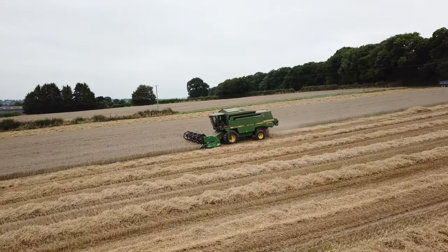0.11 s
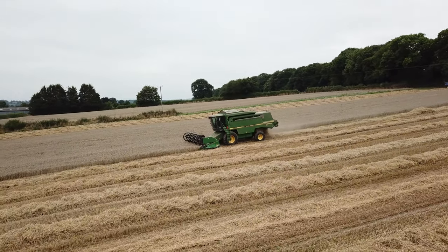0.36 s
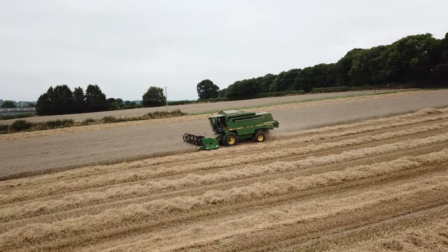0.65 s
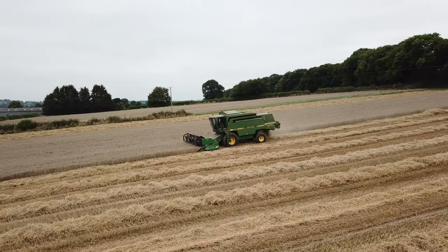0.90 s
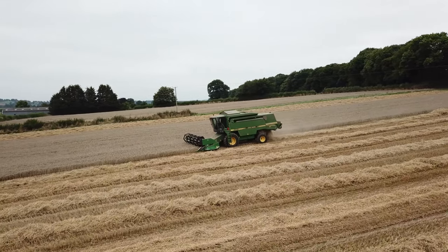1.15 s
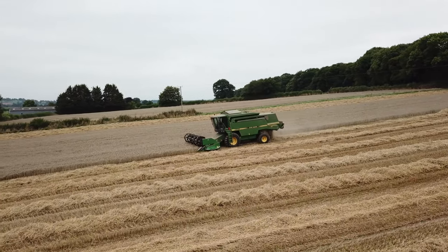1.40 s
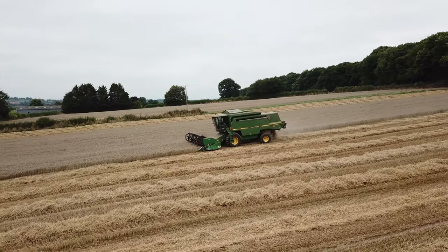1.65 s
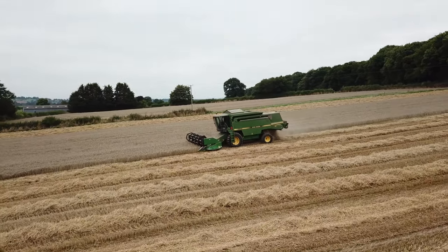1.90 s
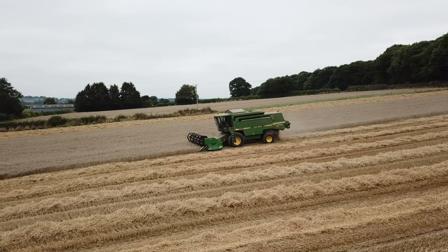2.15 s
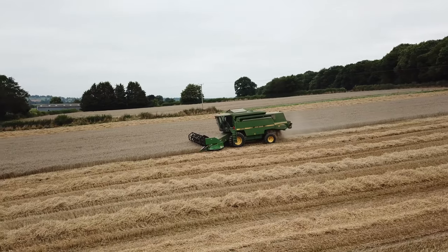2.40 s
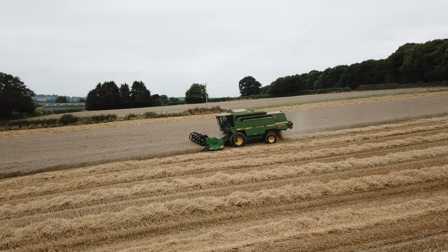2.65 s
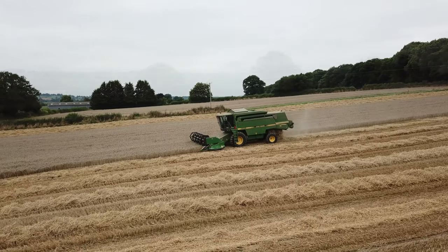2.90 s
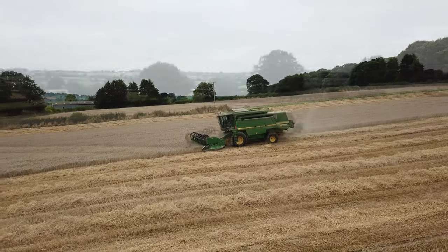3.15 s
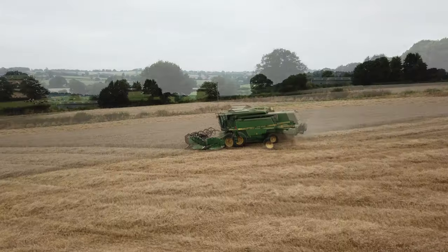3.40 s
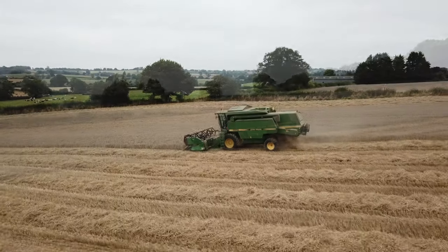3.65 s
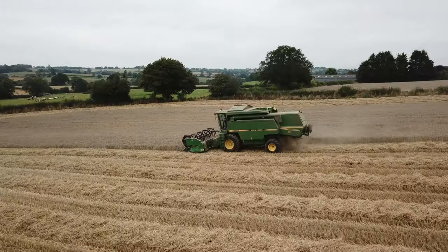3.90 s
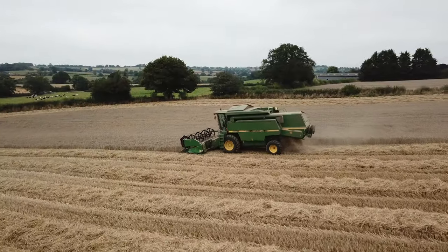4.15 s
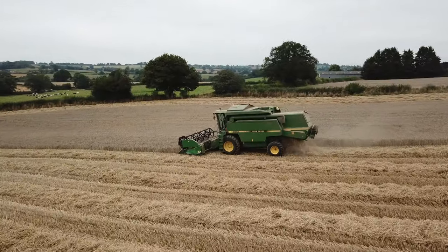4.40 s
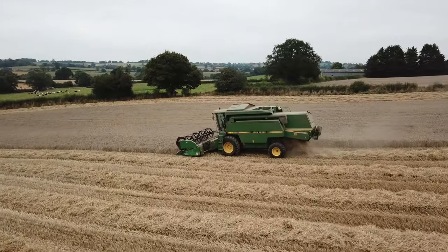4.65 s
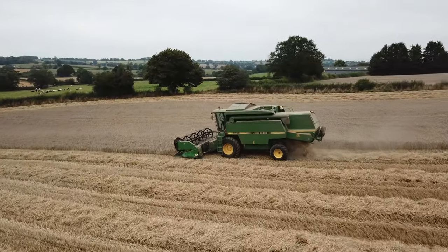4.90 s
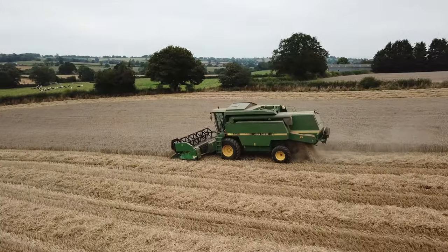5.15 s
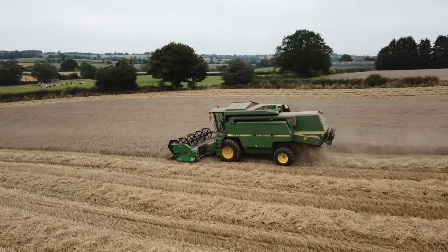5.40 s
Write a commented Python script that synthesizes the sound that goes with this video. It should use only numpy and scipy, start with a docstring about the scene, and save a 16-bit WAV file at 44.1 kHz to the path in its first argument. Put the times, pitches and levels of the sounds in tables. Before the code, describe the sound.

Outdoors in an open field, a combine harvester works some way off with a low throbbing engine, drum hum and muffled threshing roar. Close to the microphone a small motor whines steadily and hisses, and wind thumps. A grainy rattle swells, a belt squeals, then after a momentary dip the engine returns stronger, with small metal clinks.

```python
"""A combine harvester works a field some way off, heard from two spots. Throughout, shaft orders and
a drum hum (sines) lie under threshing roar (shaped noise); a small motor by the microphone whines
(multiples of its speed) and rasps (pulsed hiss), and wind rumbles on the microphone. At the first
spot faint tones come from 1.8 s, a header rattle swells from about 2 s and a belt squeals at 2.9 s.
A quick fade at 3.4 s joins the second spot, where small metal parts clink (decaying sines)."""
import sys
import numpy as np
from scipy import signal
from scipy.fft import rfft, irfft
from scipy.io import wavfile
from scipy.ndimage import uniform_filter1d

SR = 44100
rng = np.random.default_rng(int(sys.argv[2]) if len(sys.argv) > 2 else 0)


def generate_wav(signal):
    """Clip the signal to [-1, 1] and save it as 16-bit WAV at the path in sys.argv[1]."""
    frames = np.transpose(np.atleast_2d(signal))
    scaled = np.clip(frames, -1, 1) * 32767
    pcm = np.round(scaled).astype(np.int16)
    wavfile.write(sys.argv[1], SR, pcm)


def elevation(decibels):
    """Turn decibel levels (scalar or array-like) into linear amplitude ratios."""
    levels = np.asarray(decibels, float)
    return 10 ** (levels / 20)


N = 243873
T = np.arange(N) / SR
JOIN_S = 3.3965


def level(x, rms_db):
    """Scale to an rms level."""
    return x * elevation(rms_db) / np.sqrt(np.mean(x ** 2))


def columns(tables):
    """Curve tables laid end to end, one value per sample for each column."""
    t_s, *curves = np.transpose(sum(tables, []))
    return [np.interp(T, t_s, curve) for curve in curves]


def by_spot(first, second):
    """One value before the join, another after it."""
    return np.where(T < JOIN_S, first, second)


def walk(rate_hz):
    """Random levels held 1 / rate and slewed twice; standard deviation 1."""
    hold = int(SR / rate_hz)
    steps = np.repeat(rng.standard_normal(N // hold + 1), hold)
    slewed = uniform_filter1d(uniform_filter1d(steps, hold), hold)[:N]
    return slewed / slewed.std()


def noise(colour):
    """Noise shaped by (f/Hz, relative level/dB) points, rms 1."""
    hz, db = np.transpose(colour)
    bin_hz = np.arange(1, N // 2 + 2) * SR / N
    gain = elevation(np.interp(np.log(bin_hz), np.log(hz), db))
    return level(irfft(rfft(rng.standard_normal(N)) * gain, N), 0)


def tone(hz, waver_db, waver_turns, rate_hz):
    """A sine of rms about 1 whose level and phase waver at random."""
    turns = np.cumsum(hz + 0 * T) / SR + rng.random() + waver_turns * walk(rate_hz)
    return np.sqrt(2) * elevation(waver_db * walk(rate_hz)) * np.sin(2 * np.pi * turns)


# Wind rumble strength, one curve per spot: t/s, level/dB
WIND = [
    [(0.0, -30), (0.4, -36.5), (0.75, -29), (1.0, -32), (1.35, -35), (2.0, -33), (2.5, -27.5), (2.9, -35.5),
     (3.1, -29.5), (3.38, -33)],
    [(3.41, -37), (3.9, -32.5), (4.05, -38.5), (4.35, -33.5), (4.5, -39), (4.7, -33), (5.53, -35.5)],
]
# Rumble spectrum per spot: f/Hz, relative level/dB
WIND_COLOUR = [
    [(8, -25), (16, -9), (28, -1), (45, 1.5), (70, 5), (120, 0), (220, -25.5), (400, -30), (1600, -90),
     (8000, -160)],
    [(8, -32.5), (20, -18), (38, 0.5), (55, -2), (80, 1.5), (120, -4), (220, -14), (400, -35),
     (1600, -85.5), (8000, -160)],
]
# Buffets on the microphone: t/s, pulse scale/dB, half width/s
BUFFETS = [(0.672, -13, 0.0023), (0.799, -17, 0.0023), (0.883, -17, 0.0023), (0.923, -17, .004),
           (0.972, -18, 0.0045), (1.2, -14, 0.0032), (2.091, -29, 0.0036), (2.387, -20, 0.0028),
           (2.487, -19, .003), (2.672, -16, .0035), (3.107, -21, 0.0036), (3.374, -9.5, 0.0037)]
GUST_DB, GUST_RATE_HZ = 1., 18.


def wind():
    """Gusty low-frequency noise plus single deep pressure pulses."""
    db, = columns(WIND)
    out = elevation(db + GUST_DB * walk(GUST_RATE_HZ)) * by_spot(*map(noise, WIND_COLOUR))
    for t_s, scale_db, half_s in BUFFETS:
        u = (T - t_s) / half_s
        dip = (u ** 2 / 4 - 1) * np.exp(-u ** 2 / 2)
        broad = 0.39 * np.exp(-u ** 2 / 16)
        out = out + elevation(scale_db) * (dip + broad)
    return out


# Faint rough tones: start t/s, length/s, first f/Hz, last f/Hz, level/dB
STREAKS = [(1.78, .27, 860, 870, -58), (2.09, .27, 1003, 1003, -55.5), (2.45, .4, 755, 720, -57),
           (3.358, .022, 1085, 1085, -50), (3.399, .037, 1170, 1185, -44), (3.45, 2.1, 1034, 1034, -62)]
STREAK_EDGE_S = .005


def streaks():
    """Unsteady tones come and go in the middle range; those under 0.2 s waver less."""
    out = 0
    for t_s, length_s, first_hz, last_hz, db in STREAKS:
        on = np.clip(np.minimum(T - t_s, t_s + length_s - T) / STREAK_EDGE_S, 0, 1)
        hz = np.interp(T, [t_s, t_s + length_s], [first_hz, last_hz])
        rough = min(length_s / .2, 1)
        out = out + on * elevation(db) * tone(hz, 2.5 * rough, .1 * rough, 35.)
    return out


MOTOR_HZ = 77.515  # turns per second
# Motor hiss spectrum per spot: f/Hz, relative level/dB
RASP = [
    [(2400, -31), (3000, -3), (3500, -6.5), (4400, -5.5), (4950, 1), (5350, -4.5), (6100, -7), (6600, -6),
     (7100, -9.5), (8100, -10), (8950, -22.5), (9400, -24.5), (10600, -23.5), (11100, -27.5), (12400, -30),
     (13100, -40), (13600, -64)],
    [(2400, -22), (3000, 1), (3750, 0), (4400, -3.5), (5000, -2), (6100, -3.5), (6500, 1), (6850, 1),
     (7200, -4.5), (8000, -15.5), (8400, -11.5), (9100, -18.5), (9600, -15.5), (10800, -24), (11700, -25),
     (13200, -41), (13700, -53.5)],
]
# Hiss rms before pulsing at each spot: level/dB
RASP_DB = [-52, -52.5]


def rasp():
    """Brush and bearing hiss of the motor, pulsing once, twice and four times a turn."""
    hiss = by_spot(*(elevation(db) * noise(colour) for colour, db in zip(RASP, RASP_DB)))
    turn_rad = 2 * np.pi * MOTOR_HZ * T
    pulse = 1 + 0.024 * np.sin(turn_rad) + 0.037 * np.sin(2 * turn_rad) + 0.08 * np.sin(4 * turn_rad)
    return hiss * pulse


# Motor partials: multiple of the motor turn, first-spot level/dB, second-spot level/dB
WHINE = [(12, -63, -63), (13, -64, -84), (22, -47.5, -46), (24, -48.5, -56), (26, -58, -57), (30, -63, -59),
         (31, -69, -63), (33, -71, -66), (34, -59, -59), (36, -58, -54), (38, -71, -72), (42, -85, -78),
         (44, -84, -70), (45, -79, -74), (46, -66, -63), (47, -76, -73), (48, -66, -56), (50, -68, -78),
         (51, -78, -83), (52, -71, -82), (54, -67, -68), (55, -71, -71), (56, -65, -69), (57, -78, -91),
         (58, -64, -68), (59, -74, -81), (60, -64, -72), (61, -68, -74), (62, -62, -64), (63, -84, -76),
         (64, -76, -78), (65, -72, -87), (66, -72, -74), (67, -75, -87), (71, -82, -78), (72, -73, -74),
         (78, -79, -82), (80, -78, -79), (84, -71, -67), (86, -76, -71), (88, -76, -71), (96, -85, -83),
         (100, -93, -87), (106, -83, -90), (108, -81, -86), (109, -84, -88), (112, -79, -80),
         (114, -88, -91), (120, -93, -87), (122, -95, -87), (144, -98, -96), (146, -97, -95)]
MOTOR_WANDER = .00015  # fraction of speed


def whine():
    """Clean multiples of one motor speed that wanders very slightly; even ones lead."""
    hz = MOTOR_HZ * (1 + MOTOR_WANDER * walk(2.))
    out = 0
    for multiple, first_db, second_db in WHINE:
        out = out + elevation(by_spot(first_db, second_db)) * tone(multiple * hz, .8, 0.025, 9.)
    return out


# Header rattle strength: t/s, level/dB
HEADER = [(0, -53.5), (1.5, -54.5), (2.0, -49.5), (2.8, -48), (3.38, -52.5)]
# Rattle spectrum: f/Hz, relative level/dB
HEADER_COLOUR = [(250, -89), (480, -10.5), (700, -0.5), (850, 2), (1150, -8), (1500, -11), (4000, -120)]


def header():
    """A mid-band noise rattle, made grainy by fast level steps; first spot only."""
    db, = columns([HEADER])
    return (T < JOIN_S) * elevation(db + 1.4 * walk(30.47)) * noise(HEADER_COLOUR)


# Metal strikes: t/s, level/dB, f/Hz, decay time constant/s
CLINKS = [(3.951, -32, 1400, .002), (4.5443, -22.5, 1450, .002), (4.5475, -27, 1950, .0012),
          (4.5505, -28, 1600, .0012), (5.118, -33, 2550, .0012), (5.1347, -36.5, 3780, .0025),
          (5.444, -33, 1803, .003)]
CLINK_ATTACK_S = .0005


def clinks():
    """Small metal parts knock or tick for an instant: sines that decay exponentially."""
    out = 0
    for t_s, db, hz, decay_s in CLINKS:
        age_s = np.maximum(T - t_s, 0)
        envelope = (1 - np.exp(-age_s / CLINK_ATTACK_S)) * np.exp(-age_s / decay_s)
        out = out + elevation(db) * envelope * np.sin(2 * np.pi * hz * age_s)
    return out


SQUEAL_S, SQUEAL_HZ, SQUEAL_SCOOP_HZ = 2.932, 864, 45  # start, pitch, depth of the rise in pitch
SQUEAL_BITE_DB, SQUEAL_HOLD_DB = -40.5, -51
SQUEAL_RISE_S, SQUEAL_GRIP_S, SQUEAL_SETTLE_S = .045, .03, .06
SLIP_HZ, SLIP_DEPTH, SLIP_FIRST_S = 25., .55, 3.048


def squeal():
    """A belt bites, then slips in quick pulses and sings roughly."""
    age_s = np.maximum(T - SQUEAL_S, 0)
    rise = np.minimum(age_s / SQUEAL_RISE_S, 1)
    bite = np.exp(-np.maximum(age_s - SQUEAL_RISE_S - SQUEAL_GRIP_S, 0) / SQUEAL_SETTLE_S)
    loose = 1 - bite
    db = SQUEAL_HOLD_DB + (SQUEAL_BITE_DB - SQUEAL_HOLD_DB) * bite
    on = rise * (T < JOIN_S)
    slip_turns = SLIP_HZ * (T - SLIP_FIRST_S) + .1 * walk(10.)
    slip = 1 + SLIP_DEPTH * loose * np.cos(2 * np.pi * slip_turns)
    hz = SQUEAL_HZ - SQUEAL_SCOOP_HZ * (1 - rise ** 2) + (2 + 4 * loose) * walk(15.)
    return on * slip * elevation(db) * tone(hz, .6 + .8 * loose, .03 + .07 * loose, 60.)


# Drum hum, one curve per spot: t/s, level/dB
DRUM = [
    [(0.0, -41), (0.3, -41), (0.85, -34), (1.1, -37.5), (2.0, -40.5), (2.47, -30), (2.8, -32), (3.38, -40)],
    [(3.41, -49), (3.9, -34), (5.2, -43.5), (5.53, -35)],
]
# Upper hum: f/Hz, first-spot level/dB, second-spot level/dB
DRUM_OCTAVE = (187.6, -45, -46.5)
DRUM_HZ, DRUM_WANDER_HZ, DRUM_WAVER_DB = 93.4, .7, 1.3


def drum():
    """The threshing drum hums low, its speed wandering with the crop, with an octave of steadier pitch."""
    db, = columns(DRUM)
    hum = tone(DRUM_HZ + DRUM_WANDER_HZ * walk(3.), DRUM_WAVER_DB, 0.06, 12.)
    octave_hz, first_db, second_db = DRUM_OCTAVE
    octave = tone(octave_hz, 2.8, 0.044, 6.5)
    return elevation(db) * hum + elevation(by_spot(first_db, second_db)) * octave


# Threshing spectrum per spot: f/Hz, relative level/dB
ROAR = [
    [(71, -24.5), (120, -4), (168, -5), (414, -24), (710, -24), (1170, -21.5), (1590, -16.5), (1680, -19),
     (1900, -22.5), (2140, -23), (2730, -23.5), (3000, -40), (3900, -61), (6600, -120)],
    [(71, -26), (120, -8.5), (161, -7.5), (200, -11.5), (304, -17.5), (431, -29), (1120, -30), (1590, -22),
     (1730, -27.5), (1820, -27.5), (2730, -29.5), (3000, -54.5), (3900, -68), (6600, -120)],
]
# Roar rms before swell at each spot: level/dB
ROAR_DB = [-38, -35.5]


def roar():
    """Broad threshing noise in five overlapping octave bands that swell together and flutter alone."""
    steady = by_spot(*(elevation(db) * noise(colour) for colour, db in zip(ROAR, ROAR_DB)))
    spectrum = rfft(steady)
    octave = np.log2(np.arange(1, len(spectrum) + 1) * SR / N / 250)  # above 250 Hz
    swell_db = 0.31 * walk(7.)
    out = 0
    for centre in range(5):
        share = np.clip(1 - np.abs(np.clip(octave, 0, 4) - centre), 0, 1)
        flutter_db = 0.7 * walk(24.) + 0.4 * walk(4.)
        out = out + irfft(spectrum * share, N) * elevation(swell_db + flutter_db)
    return out


# Engine shaft, one curve per spot: t/s, shaft f/Hz, base level/dB
ENGINE = [
    [(0.0, 38.57, -33), (0.25, 38.58, -30.5), (0.55, 38.4, -34), (0.8, 38.56, -35), (1.2, 38.64, -35),
     (1.55, 38.31, -34), (2.0, 38.69, -35.5), (2.5, 38.33, -34.5), (2.8, 38.77, -34.5), (3.38, 38.52, -34)],
    [(3.41, 37.93, -24), (3.5, 38.1, -27), (3.55, 37.85, -26.5), (3.63, 37.87, -32), (3.79, 38.0, -28),
     (3.87, 38.2, -32), (3.93, 38.32, -25), (4.05, 38.12, -25), (4.11, 37.5, -25.5), (4.18, 37.54, -30),
     (4.25, 37.5, -24.5), (4.32, 37.55, -31.5), (4.41, 37.43, -26.5), (4.5, 37.5, -29.5), (4.9, 38.03, -30),
     (4.97, 37.86, -26.5), (5.09, 37.84, -32), (5.19, 37.75, -26.5), (5.34, 37.86, -31), (5.48, 38.1, -23),
     (5.53, 37.85, -24.5)],
]
# Orders: multiple of shaft f, first-spot level/dB, second-spot level/dB, added to the base level
ENGINE_ORDERS = [(1, -15.5, -24.5), (3, -1.5, -11), (4, 0, 0.5), (4.5, -23, -20), (5, -22.5, -19),
                 (5.5, -18, -21.5), (6, -14.5, -19.5), (7, -23, -20), (8, -21.5, -17), (9, -49, -36)]
# Slow swell per spot: t/s, then third, sixth, seventh and eighth order level/dB
ORDER_SWELL = [
    [(0.0, -4.5, -3, 0, -3.5), (0.7, -4, -6, 0, 4), (1.0, 0, 2, 0, -1), (1.7, -1.5, 2.5, 0, -2.5),
     (2.3, 2, 1.5, 0, 4), (2.6, 0, -4.5, -1, -1), (3.38, 2, -4, -1, -1)],
    [(3.41, 0, 0.78, 0, 6), (3.6, 0, -0.3, 3, -2.5), (3.8, 0, -2, 1, -3.5), (4.0, 0, -2, -4, 2),
     (4.35, 1, -1.98, -3, -2), (4.5, 0, 0.37, 3, 3), (5.05, -1, 0.84, 3, 0), (5.2, -1, 0, -3, 0),
     (5.53, -0.98, 0.017, 0, 6.5)],
]


def engine():
    """Shaft orders: the fourth follows the level curve and flutters, the rest waver about its mean."""
    hz, db = columns(ENGINE)
    mean_db = by_spot(db[T < JOIN_S].mean(), db[T > JOIN_S].mean())
    swell_db = dict(zip((3, 6, 7, 8), columns(ORDER_SWELL)))
    out = 0
    for order, first_db, second_db in ENGINE_ORDERS:
        if order == 4:
            base_db = db
            partial = tone(hz * order, by_spot(1.0, .6), .014, 20.)
        else:
            base_db = mean_db + swell_db.get(order, 0)
            partial = tone(hz * order, by_spot(1.1, 1.0), .005 * order, 14.)
        out = out + partial * elevation(base_db + by_spot(first_db, second_db))
    return out


FADE_OUT_S, FADE_IN_S = 0.0047, .016


def scene():
    """All sources, faded to silence for an instant at the join."""
    near = wind() + rasp() + whine()
    field = streaks() + header() + clinks() + squeal() + drum() + roar() + engine()
    fade = np.clip(np.abs(T - JOIN_S) / by_spot(FADE_OUT_S, FADE_IN_S), 0, 1)
    return ((near + field) * fade)[None]


def roll_off(x):
    """The treble ends steeply here."""
    return signal.sosfilt(signal.butter(12, 14300, fs=SR, output="sos"), x)


def record(dry):
    """Hand on the finished mix."""
    return roll_off(dry)


dry = scene()
out = record(dry)
generate_wav(out)
```